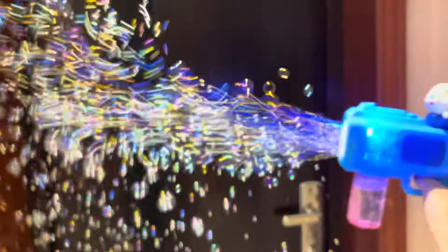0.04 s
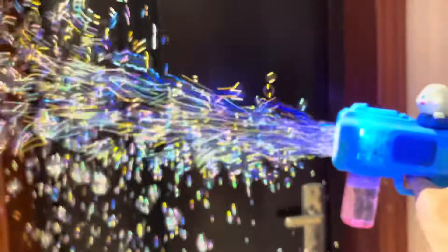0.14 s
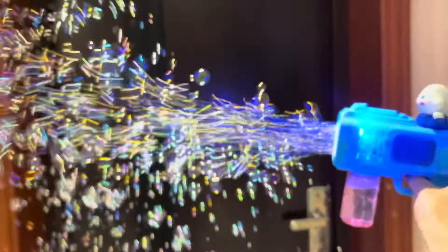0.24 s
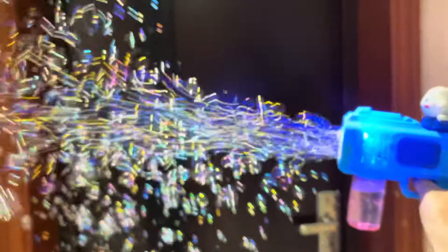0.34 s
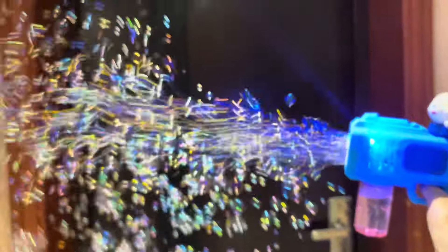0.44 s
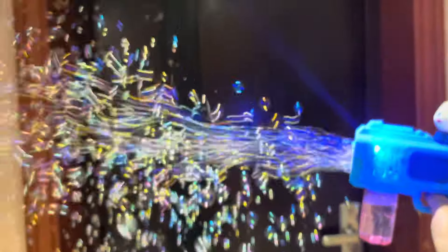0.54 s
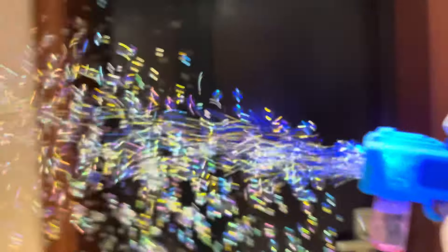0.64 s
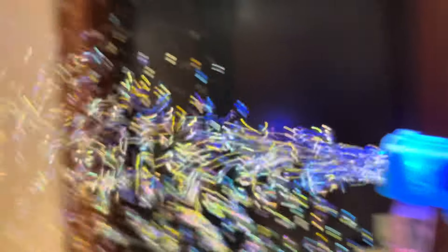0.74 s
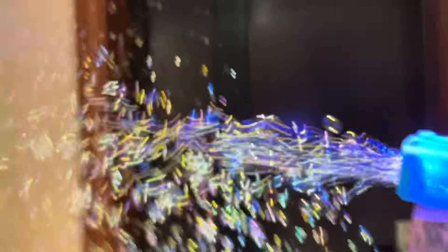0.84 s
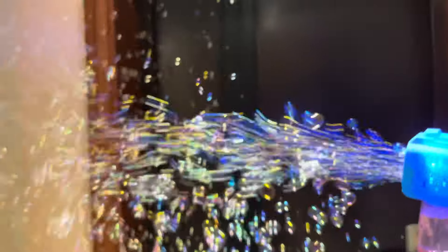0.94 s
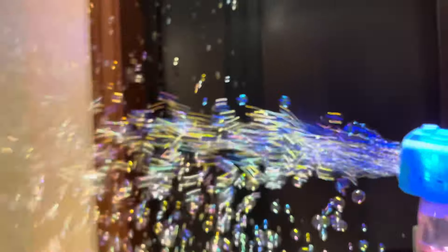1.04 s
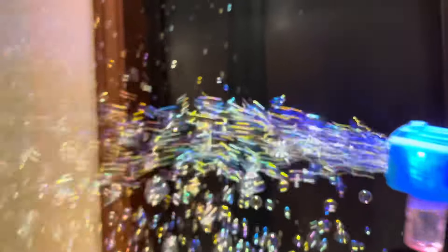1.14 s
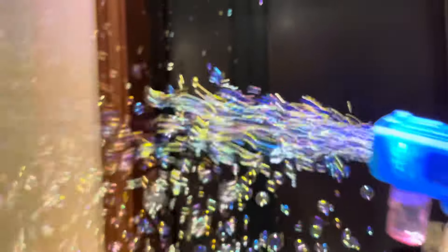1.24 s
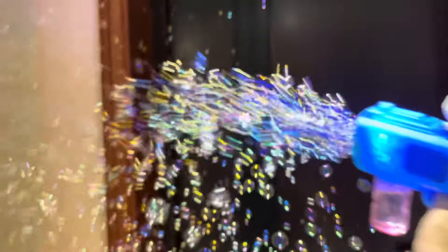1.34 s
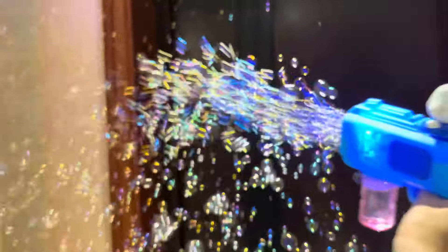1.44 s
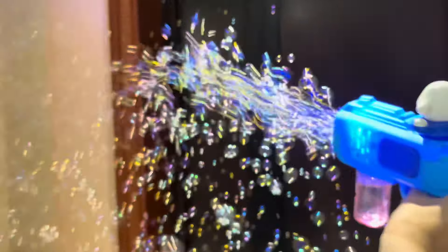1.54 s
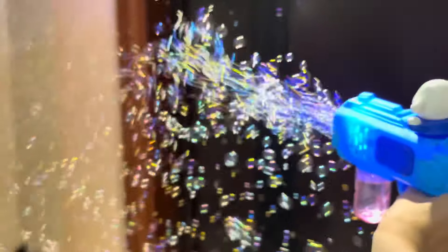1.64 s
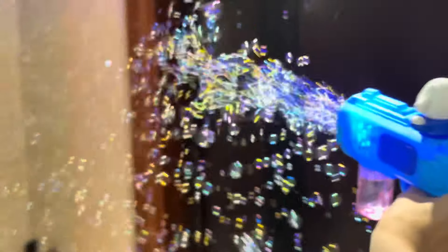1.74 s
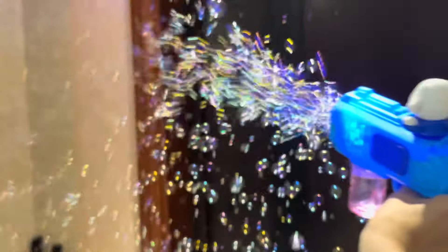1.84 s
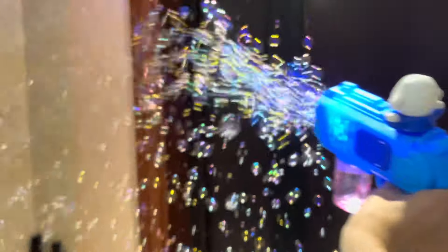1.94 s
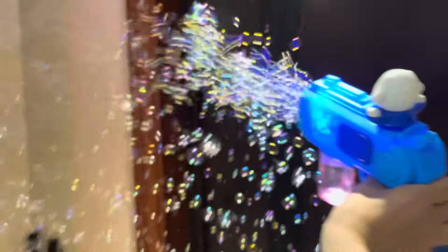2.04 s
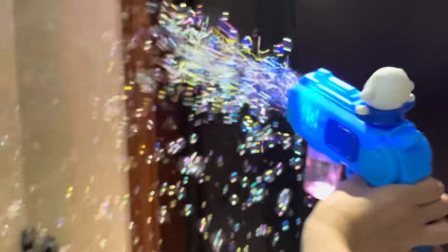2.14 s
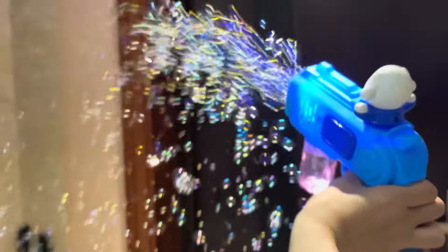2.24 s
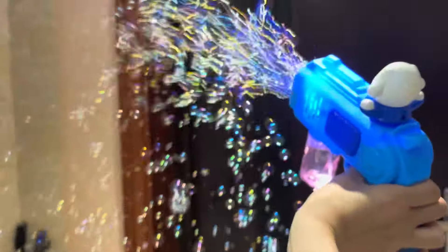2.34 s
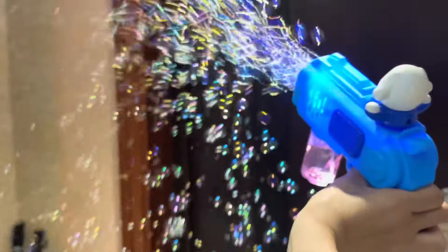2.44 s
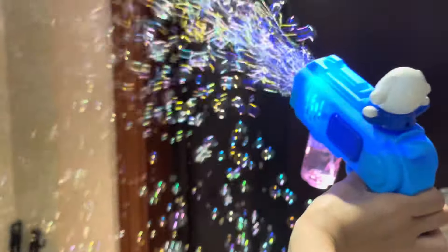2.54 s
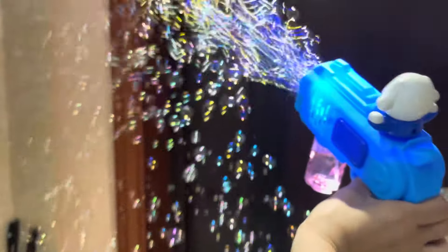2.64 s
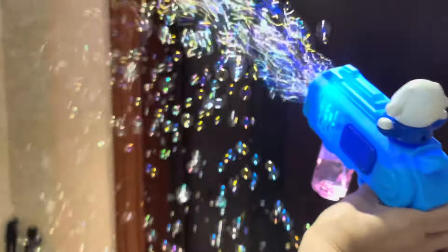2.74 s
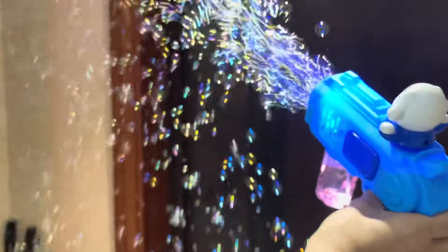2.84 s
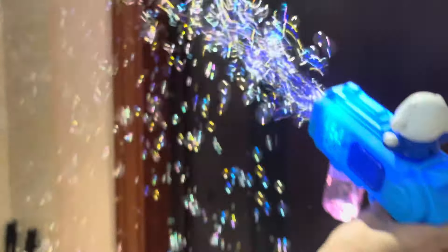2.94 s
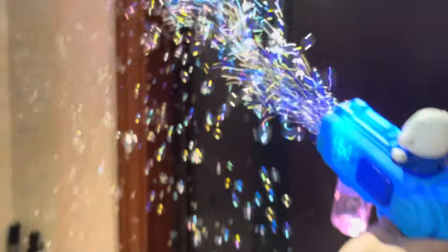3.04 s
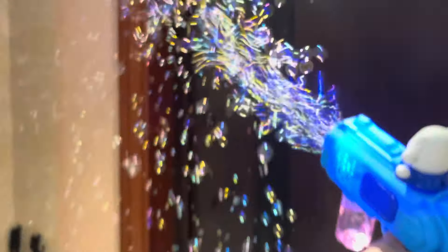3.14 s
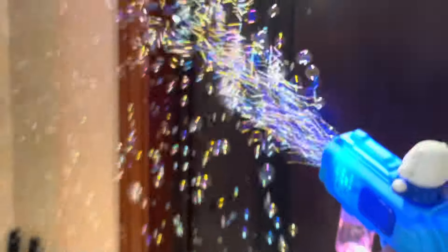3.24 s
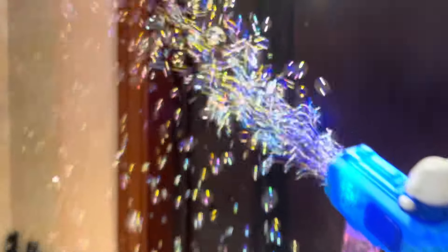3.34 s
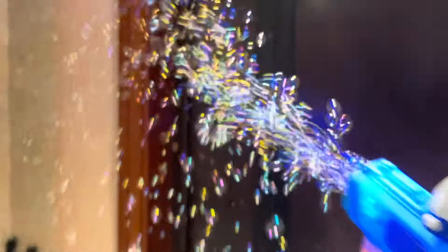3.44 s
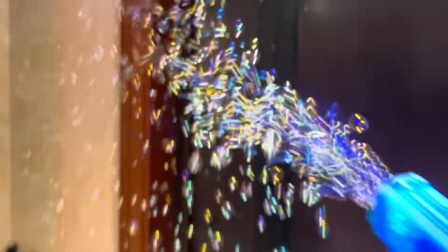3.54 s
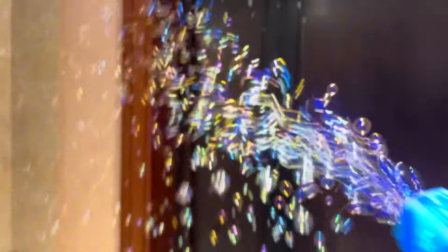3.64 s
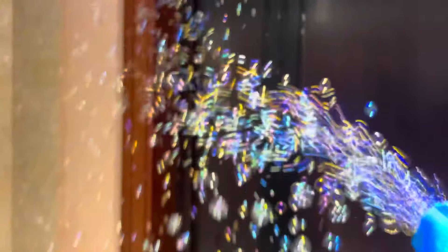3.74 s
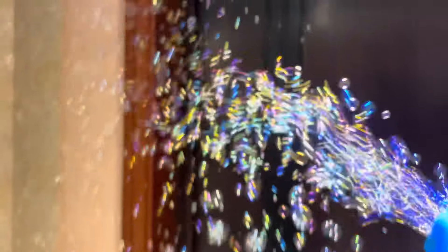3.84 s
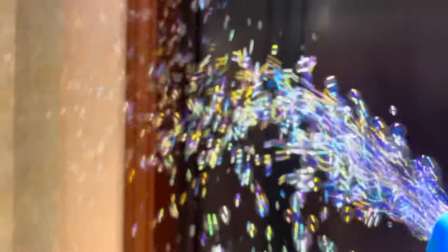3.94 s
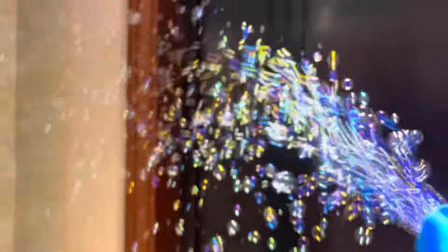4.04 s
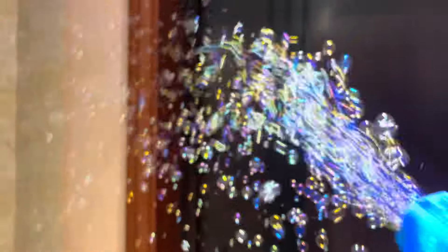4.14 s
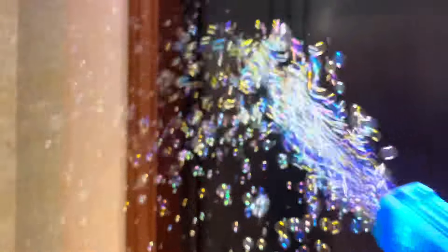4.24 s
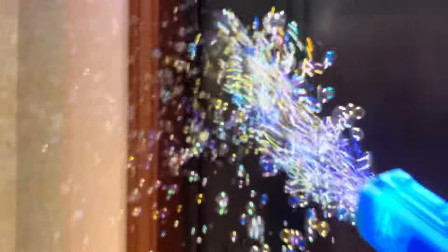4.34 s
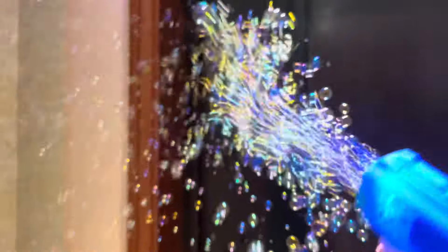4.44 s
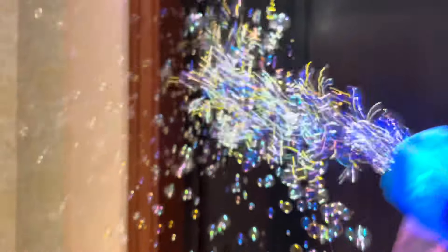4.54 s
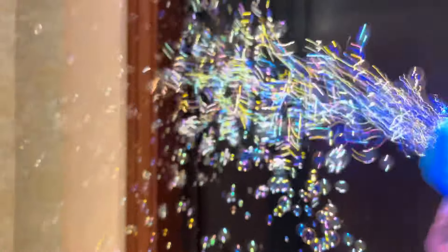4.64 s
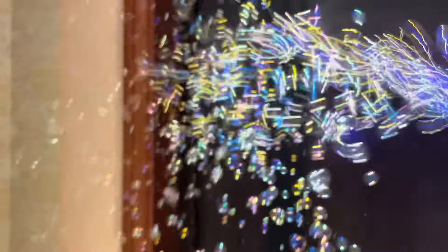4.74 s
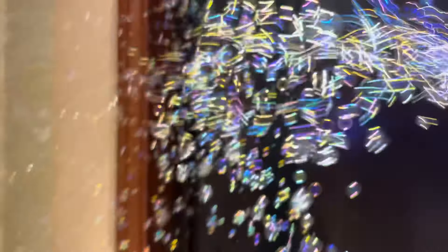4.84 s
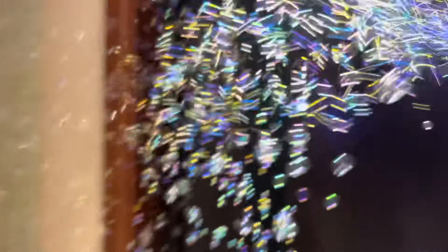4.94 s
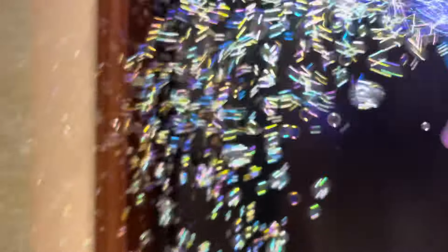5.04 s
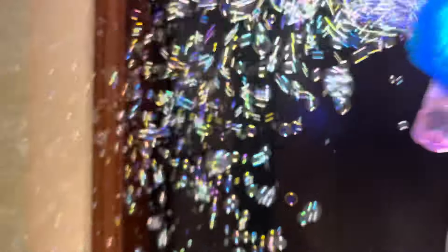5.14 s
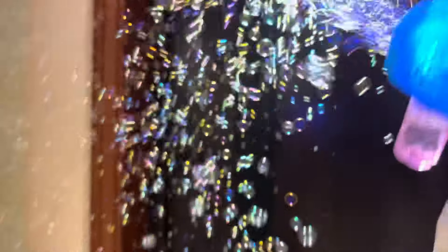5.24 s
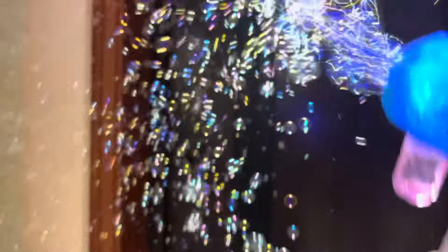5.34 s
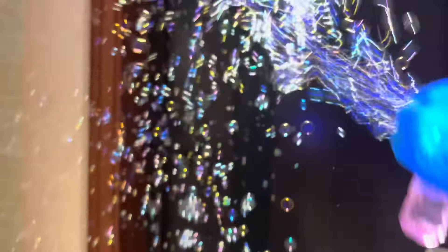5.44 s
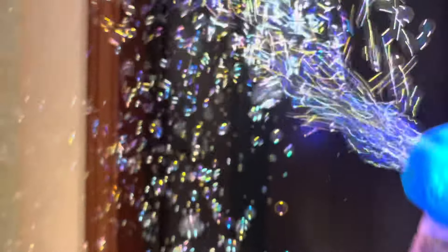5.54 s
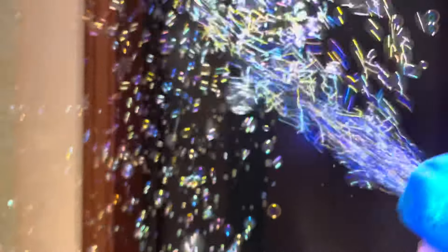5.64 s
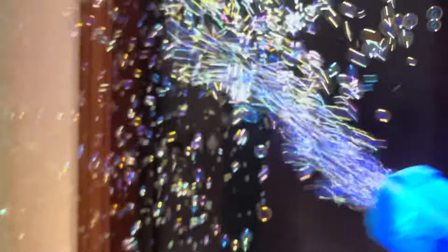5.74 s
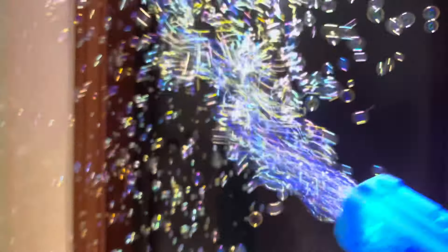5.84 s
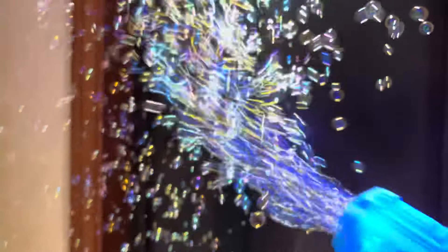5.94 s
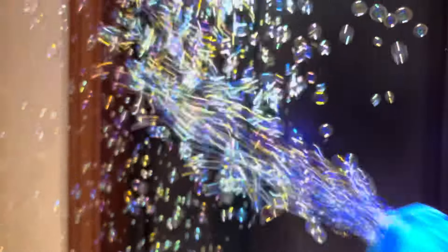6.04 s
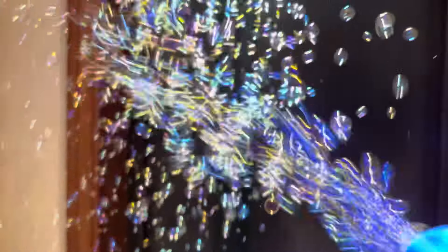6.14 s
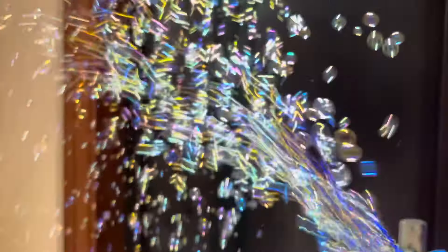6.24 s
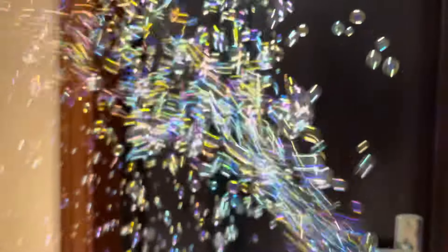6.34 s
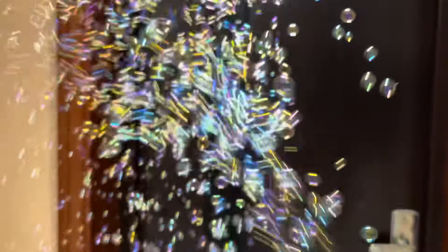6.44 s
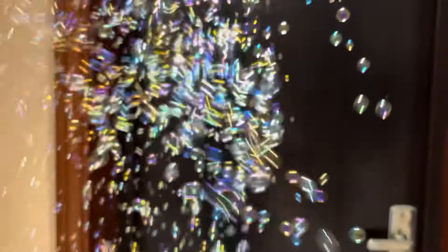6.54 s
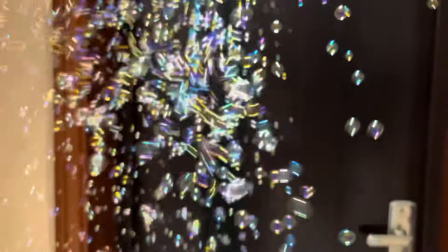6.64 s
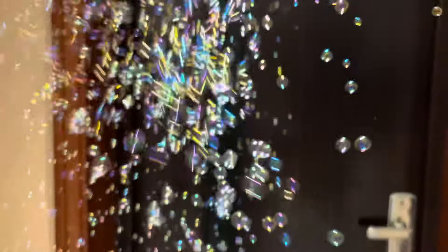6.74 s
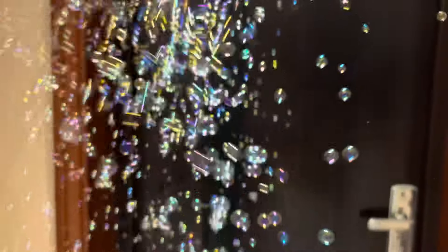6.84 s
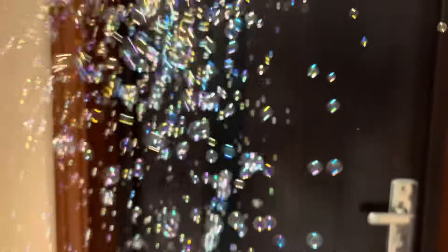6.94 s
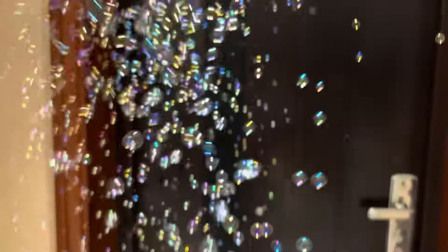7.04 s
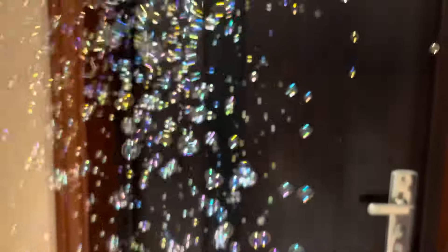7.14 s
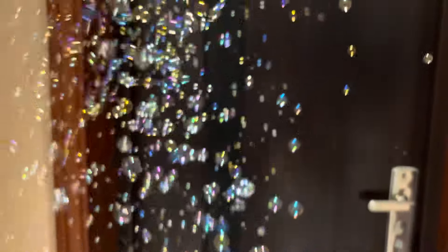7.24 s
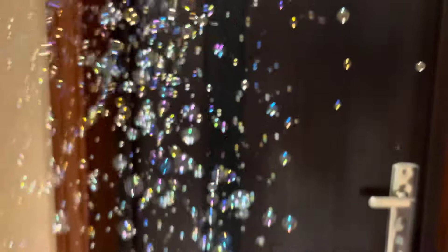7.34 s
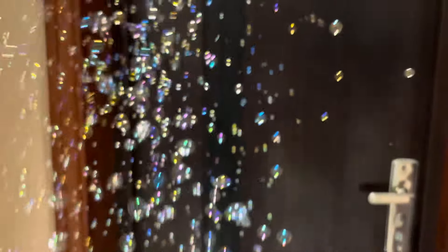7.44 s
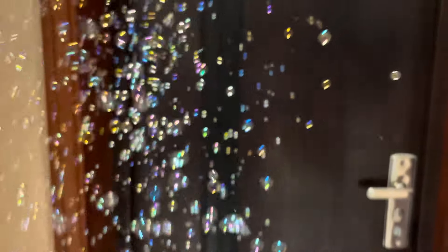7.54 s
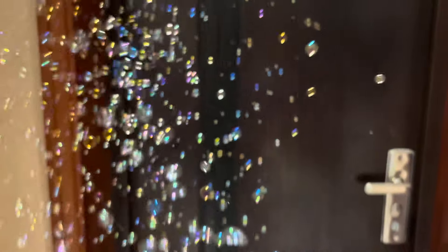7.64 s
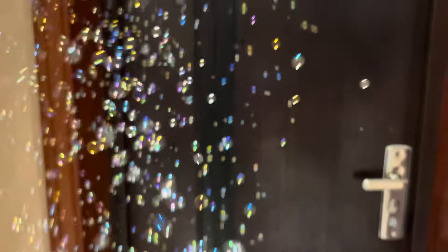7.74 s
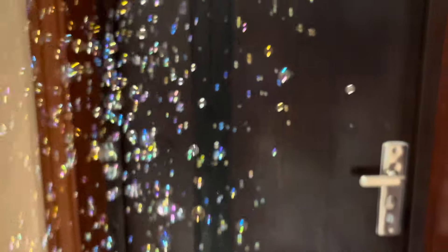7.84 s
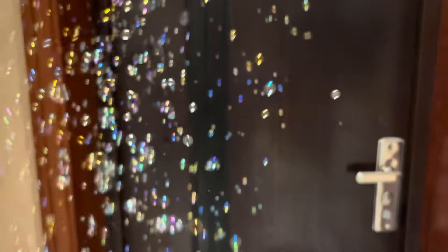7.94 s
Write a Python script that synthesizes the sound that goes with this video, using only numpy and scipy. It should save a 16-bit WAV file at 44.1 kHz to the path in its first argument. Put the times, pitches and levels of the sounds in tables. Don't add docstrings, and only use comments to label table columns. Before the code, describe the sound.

From 0 s a toy bubble gun runs at full speed very close to a stereo phone in a small hallway. Its motor hums low and steady near 260 hertz, while the fan adds a strong whistle around 1.8 kilohertz and a shimmering octave above. Plastic casing buzz, rushing nozzle air and dense, bright bubble fizz surround the tones. Until about 6.2 s, hand movement makes the whistles flicker, flare and fade unevenly between left and right, with slight pulsing in speed. At 6.2 s the trigger is released: pitch and loudness fall quickly, the whistle breaks up, and films sputter until about 6.7 s, with crisp pops and a soft low boom around 6.6 s. From 7 to 8 s only faint draught, low building rumble, distant machine drone and sparse, tiny high-pitched bubble pops remain, the draught swelling gently near 7.3 s.

```python
import sys
import numpy as np
from scipy import signal
from scipy.fft import rfft, irfft, next_fast_len
from scipy.io import wavfile
from scipy.ndimage import uniform_filter1d, map_coordinates

SR = 44100
rng = np.random.default_rng(int(sys.argv[2]) if len(sys.argv) > 2 else 0)


def gain_from_decibels(decibels):
    exponent = np.asarray(decibels, float) / 20
    return 10 ** exponent


def waveform_to_disk(signal):
    frames = np.transpose(np.atleast_2d(signal))
    scaled = np.clip(frames, -1, 1) * 32767
    samples = np.round(scaled).astype(np.int16)
    wavfile.write(sys.argv[1], SR, samples)


N = 352800
SECONDS = np.arange(N) / SR
LEFT_RIGHT = np.array([[.5], [-.5]])


def unit(x):
    return x / np.sqrt(np.mean(x ** 2) + 1e-20)


def along(points, hz):
    f, v = np.transpose(points)
    return np.interp(np.log(hz + 1), np.log(f + 1), v)


def curves(rows):
    s, *cols = np.transpose(rows)
    return [np.interp(SECONDS, s, c) for c in cols]


def bells(rows):
    return sum(np.exp(-((SECONDS - s) / half_s) ** 2) * np.array(change)[:, None]
               for s, half_s, *change in rows)


def wobble(rate):
    return map_coordinates(rng.standard_normal(int(N * rate / SR) + 4), [np.arange(N) * rate / SR])


def tone(angle, left_db, right_db, lead):
    left = gain_from_decibels(left_db) * np.sin(angle + lead / 2)
    right = gain_from_decibels(right_db) * np.sin(angle - lead / 2)
    return np.sqrt(2) * np.array([left, right])


def patchy(patch_db):
    z = signal.stft(rng.standard_normal(N), nperseg=1024)[2]

    def drift(bins, frames):
        across = uniform_filter1d(rng.standard_normal(z.shape), bins, 0)
        return unit(uniform_filter1d(across, frames, 1))

    gain_db = patch_db * drift(bins=12, frames=5) + 2.22 * drift(bins=2, frames=60)
    return unit(signal.istft(z * gain_from_decibels(gain_db), nperseg=1024)[1][:N])


def crackle(rate, spread_db, t60):
    hits = (rng.random(N) < rate / SR) * gain_from_decibels(spread_db * rng.exponential(size=N))
    t = np.arange(SR // 50) / SR
    return unit(signal.fftconvolve(hits, gain_from_decibels(-60 * t / t60))[:N] * rng.standard_normal(N))


# (frequency [Hz], lead [rad])
PORT_LEAD = [(60, -.5), (950, -.9), (1210, -1), (1720, -4.2), (2500, -6.3), (3010, -6.8), (4480, -6.7),
             (5170, -7.3), (5430, -9.7), (5860, -10.4), (6980, -9.5), (8180, -9.4), (9820, -6.5),
             (15800, -6.3)]
# (frequency [Hz], left minus right [dB])
PORT_LEAN = [(60, -0.5), (110, 4.5), (200, 3.5), (380, 3.5), (700, -2), (1290, 0.5), (2380, 2), (4400, -1),
             (8120, 2), (15000, 8)]
# (frequency [Hz], likeness [0 to 1])
PORT_LIKENESS = [(60, 0.94), (300, 1), (800, 0.75), (1200, 0.28), (1500, 0.03), (2000, 0.69), (4000, 0.69),
                 (5300, 0.57), (6500, 0.47), (7500, 1), (9000, 0.2), (10500, 0.83), (14000, 0.31),
                 (16000, 0.4)]


def ports(direct, spectrum, likeness=1, shell=()):
    m = next_fast_len(N + 8192)
    hz = np.fft.rfftfreq(m, 1 / SR)
    alike = np.clip(likeness * along(PORT_LIKENESS, hz), 0, 1)
    own = rfft(rng.standard_normal((2, N)), m)
    shared = rfft(unit(direct), m) * np.exp(1j * LEFT_RIGHT * along(PORT_LEAD, hz))
    mix = np.sqrt(alike) * shared + np.sqrt(1 - alike) * own
    ring_db = sum(db * np.exp(-((hz - centre) / width) ** 2) for centre, width, db in shell)
    colour_db = along(spectrum, hz) + ring_db + LEFT_RIGHT * along(PORT_LEAN, hz)
    return unit(irfft(mix * gain_from_decibels(colour_db), m)[:, :N])


# (time [s], shaft turns [Hz], hum level [dB], left minus right [dB])
SHAFT_DRIVE = [(0, 258, -30.5, 3), (.24, 258.4, -29.5, 3), (.68, 257.3, -29.5, 2),
               (1.12, 257.8, -28.5, 2.5), (1.4, 257.5, -27, 2), (1.62, 256.4, -27.5, 2.5),
               (2.22, 257.7, -25.5, 2), (2.5, 261.7, -28.5, 6), (3.1, 258.2, -27.5, 4),
               (3.4, 260.7, -27.5, 3.5), (3.8, 261.7, -29.5, 7.5), (4.2, 260.9, -28.5, 5),
               (4.42, 260, -27.5, 4.5), (4.64, 260, -27, 4), (4.86, 259.3, -27.5, 6),
               (5.2, 258.3, -24.5, 3.5), (5.55, 261.5, -29, 4.5), (5.8, 265, -27.5, -3)]


def speed():
    release_s, drag_s, friction_hz = 6.214, .435, 15
    driven = curves(SHAFT_DRIVE)[0]
    free_s = np.maximum(SECONDS - release_s, 0)
    turns = np.maximum((driven + friction_hz) * np.exp(-free_s / drag_s) - friction_hz, 1)
    return turns, np.log10(turns / driven)


# (shaft turns [Hz], level [dB])
HUM_RADIATION = [(25, -60), (70, -39), (110, -26), (150, -19), (172, -24), (186, -8), (238, 4), (254, 0.5)]


def shaft_hum(angle, stroke, turns):
    _, hum_db, aim_db = curves(SHAFT_DRIVE)
    hum_db = hum_db + 1.05 * np.cos(stroke - 2.3) + along(HUM_RADIATION, turns)
    return tone(angle, hum_db + aim_db / 2, hum_db - aim_db / 2, -0.69)


# (time [s], half-length [s], left level [dB], right level [dB])
WHISTLE_FLARES = [(0.0, 0.035, -9, -20), (0.26, 0.081, 2, -4.5), (0.46, 0.089, 5, -1.5),
                  (0.56, 0.21, -15, -3), (0.76, 0.042, 10, 1.5), (0.9, 0.23, -2.5, -6),
                  (1.4, 0.08, -7, 3.5), (1.64, 0.058, 1, 2.5), (2.18, 0.039, -10, -0.5),
                  (2.38, 0.31, 0.5, 2.7), (2.48, 0.035, -12, -1), (2.72, 0.045, -4, 1.1),
                  (3.06, 0.24, 0.5, -3.5), (3.24, 0.02, -16, -8), (3.7, 0.028, -5, 0),
                  (4.16, 0.084, -0.5, -8), (4.46, 0.17, -9.5, -2.5), (4.5, 0.39, 3.5, -8.5),
                  (4.66, 0.037, -2, -2), (4.84, 0.073, 3, 3), (5.08, 0.097, -3, 4), (5.18, 0.093, -6, -20),
                  (5.5, 0.18, 8, 4), (5.62, 0.088, -1.5, 4), (5.7, 0.029, 4.5, 0), (5.78, 0.1, -8, 1),
                  (.75, .045, 4.5, 9), (.63, .03, 0, -4), (1.7, .09, 4.5, 4), (3.22, 0.071, 2, 3),
                  (4.35, .17, 1.5, 5), (4.55, .06, -1, 5), (5.28, .03, -3, -4), (5.55, .06, 0, -3.5),
                  (3.85, .1, -2.5, -0.5), (6.32, 0.046, -3, -2)]
# (time [s], half-length [s], whistle level [dB], octave level [dB])
QUICK_FLICKERS = [(.09, 0.046, -0.5, 0), (3.29, .025, 1.5, -2), (4.45, 0.027, 1, 3), (3.18, 0.041, 4.5, 0),
                  (3.7, 0.047, -1, -2.5), (.23, 0.062, -2.5, 0.5), (.33, 0.025, -6, -3),
                  (.43, 0.099, 0.5, 1.5), (.74, 0.036, -7.5, -2), (2.285, 0.038, -7, 0), (2.87, .04, 2.5, 0),
                  (2.92, 0.018, -8, -1), (2.97, 0.026, -0.5, 0), (3.02, 0.035, -5, -13), (3.1, 0.025, 5, -10),
                  (3.18, 0.046, -5.5, -8), (3.35, 0.024, -5, 2.5), (3.85, .15, 2, 0), (4.1, 0.08, 2.5, 0),
                  (5.23, .05, 2, -6), (5.3, .07, 0.5, 0), (5.58, 0.053, 3.5, 3), (6.21, 0.03, 1, 2),
                  (6.14, 0.048, -0.5, 3.5), (6.24, 0.013, 3, 8), (6.262, 0.01, -9, -8), (6.28, .012, 3, 6),
                  (6.3, 0.013, 5, 2), (6.335, 0.011, 7, 0), (6.362, .012, -5.5, 0), (6.41, 0.02, 7, 0),
                  (6.455, 0.013, -8, -2), (6.49, .03, 3, 3), (6.56, 0.018, 0, 0), (2.15, .03, 0, 3),
                  (.38, .03, -0.5, -1), (1.7, 0.023, -2, -4.5), (6.59, 0.0388, 2, 2), (6.69, .04, -5, 0),
                  (2.97, 0.011, 3, 9), (3.048, 0.0083, -2, 11), (3.215, .015, 0, 11), (3.33, 0.011, 1, -7),
                  (5.04, 0.015, -5, 7), (5.09, 0.015, 3, 2), (5.165, 0.011, 2, 8), (5.3, 0.0164, 5, 6),
                  (5.525, 0.016, 0.5, 3.5)]
# (time [s], half-length [s], extra left lead [rad])
NOZZLE_SWINGS = [(0, .2, -1.9), (.33, .2, -1.4), (.6, .1, -1.3), (.75, .06, 1.3), (.95, .2, .8),
                 (1.65, .2, .45), (2.24, .07, .6), (2.45, .06, -.6), (2.7, .1, -1.1), (3.2, .2, .4),
                 (3.55, .1, -.6), (3.85, .25, -.75), (4.58, .12, .75), (5.05, .04, -.4), (5.15, .04, .6),
                 (5.48, .13, -.7), (5.87, .1, .6), (6.08, .15, .65), (6.45, .16, -.9)]


def blade_whistle(angle, decades):
    left_db, right_db = -19 + bells(WHISTLE_FLARES) + bells(QUICK_FLICKERS)[0] + 59 * decades
    left_db = left_db + (1.3 - 8 * decades) * wobble(40)
    right_db = right_db + (1.1 - 8 * decades) * wobble(40)
    return tone(7 * angle, left_db, right_db, 2.0 + bells(NOZZLE_SWINGS)[0])


# (time [s], half-length [s], left level [dB], right level [dB])
OCTAVE_FLARES = [(0.1, 0.034, -13, -5), (0.42, 0.38, -3, 3.5), (0.82, 0.24, 0.5, 7), (1.46, 0.062, 4, 3),
                 (1.7, 0.039, 2, 5.5), (1.78, 0.2, -11, 5.5), (2.06, 0.063, 2, -1), (2.38, 0.4, -20, -4.5),
                 (2.42, 0.11, 19.5, 1), (2.76, 0.2, 0, -4.5), (3.16, 0.1017, -10, -3), (3.54, 0.44, 0, 7),
                 (3.56, 0.083, -6, -19), (4.1, 0.1, -11, -7), (4.42, 0.17, 5, 6), (4.68, 0.047, -15, -8),
                 (4.77, 0.025, 4, 5), (5.02, 0.046, -5, -16), (5.44, 0.053, 3, -2), (5.56, 0.043, -1, 4),
                 (5.86, 0.095, -2, -2), (6.02, 0.033, 5, 1), (1.15, .06, -4.5, 3), (1.63, 0.034, 3, 3.5),
                 (3.12, .06, 4, 3), (4.63, .03, -1, -5), (4.79, 0.018, 3, 6), (4.85, .025, -8, -3),
                 (4.94, 0.027, 5, 1), (5.07, .015, -6, -6), (5.42, 0.096, -4.5, -5), (5.5, 0.016, -9, -6),
                 (5.68, 0.07, -4.5, 0), (.12, 0.043, -4, -3), (.23, .03, -5, 0), (.8, .09, 3.5, -1.5),
                 (3.1, .05, 7, 0), (3.96, .04, -5, 1.5), (5.36, 0.05, 1.5, 1), (5.93, 0.029, -7, -7),
                 (5.17, .08, -3, 2)]


def whistle_octave(angle, decades):
    left_db, right_db = -23.5 + bells(OCTAVE_FLARES) + bells(QUICK_FLICKERS)[1] + 175 * decades
    left_db = left_db + 2.3 * wobble(50)
    right_db = right_db + 1.75 * wobble(50)
    return tone(14 * angle, left_db, right_db, -.7 + .5 * wobble(6.9))


# (multiple of shaft turns, left level [dB], right level [dB], left lead [rad])
WEAK_ORDERS = [
    (4.035, -72, -35.5, -1.5),
    (4.956, -43, -37, 1.7),
    (26.79, -31, -41, -1.5),
]
# (multiple of shaft turns, level [dB])
GRIP_RATTLE = [
    (2, -36),
    (3, -44),
    (21, -45),
    (6, -32.5),
]
# (multiple of shaft turns, time [s], half-length [s], level [dB])
GRIP_SHIFTS = [(2, 0.42, 1, -12.5), (2, 4.766, 0.56, -7.5), (3, 0.906, 0.078, 18.5), (3, .25, 0.22, 9.5),
               (3, 1.44, .2, 7), (3, 2.4, .1, 11), (21, 2.4, 0.1, 10), (21, 2.69, .11, 16),
               (21, 2.98, 0.27, 10.5), (21, 3.5, 0.066, 12), (21, 6.8, .3, 5), (2, 5.63, 0.42, -4),
               (2, 1.5, 0.15, 4), (2, 3.64, 0.36, -3.5), (3, 5.95, .3, 6.5), (4, .4, 0.65, -5),
               (4, 1.54, .15, 3), (4, 2.28, .1, 8), (4, 3.53, 0.3, 3), (4, 7.9, .1, 2.5), (5, 1.7, .8, -2),
               (5, 5.2, .2, 12), (5, 5.3, 0.22, -4), (27, 4.4, 1, 2), (21, 1.1, .15, 5),
               (6, 1.36, 0.51, -23), (6, 4.72, 0.28, -10), (6, 5.6, 0.18, 6), (6, 5.74, 0.23, -14),
               (6, 6.2, 0.098, -8)]


def shaft_orders(angle, stroke, decades):
    out = np.zeros((2, N))
    gripped = [(multiple, db, db, -1) for multiple, db in GRIP_RATTLE]
    for multiple, left_db, right_db, lead in [*WEAK_ORDERS, *gripped]:
        shifts = [row[1:] for row in GRIP_SHIFTS if row[0] == round(multiple)]
        common_db = bells(shifts)[0] + 60 * decades + 4 * np.cos(stroke - 2.3)
        left_flicker, right_flicker = [wobble(3) + (1.8 + .1 * multiple) * wobble(20) for port in "LR"]
        lead = lead + 0.92 * wobble(2.11)
        left_db = left_db + common_db + left_flicker
        right_db = right_db + common_db + right_flicker
        out += tone(multiple * angle, left_db, right_db, lead)
    return out


def motor():
    turns, decades = speed()
    stroke = 2 * np.pi * np.cumsum(turns) / SR / 26.713 + 1.46
    tug = .0035 * (1 + .3 * wobble(2.5)) * np.cos(stroke)
    jitter = (0.001215 - 0.0944 * decades) * wobble(45)
    angle = 2 * np.pi * np.cumsum(turns * (1 + tug + jitter)) / SR
    tones = shaft_hum(angle, stroke, turns) + blade_whistle(angle, decades)
    return tones + whistle_octave(angle, decades) + shaft_orders(angle, stroke, decades)


# (frequency [Hz], level [dB per Hz])
CASING_COLOUR = [(25, -29), (45, -35), (200, -14), (420, -6), (800, -0.5), (1100, -0.5), (1400, -0.5),
                 (1900, -4.5), (3000, -24)]
# (frequency [Hz], half-width [Hz], level [dB])
SHELL_RINGS = [(480, 27, -2), (637, 18, -5), (935, 8.1, 3), (1004, 25, -1), (1183, 28, 3), (1380, 20, -4),
               (1384, 13, 6.5), (1470, 50, -3), (1640, 30, 3), (1910, 44, -5), (2200, 51, 1.5),
               (2450, 42, -1.5), (5500, 100, 1.5)]


def casing_buzz(decades):
    return gain_from_decibels(-24 + 28 * decades) * ports(patchy(patch_db=0.15), CASING_COLOUR, shell=SHELL_RINGS)


# (frequency [Hz], level [dB per Hz])
JET_COLOUR = [(900, -29.5), (1500, -9), (2250, 0.5), (2800, -2), (3400, -1), (4300, -4.5), (5400, -2),
              (6300, -7), (8000, -12.5), (11000, -45)]


def nozzle_jet(decades):
    rush = patchy(patch_db=1.15) + 0.19 * crackle(600, spread_db=4.5, t60=0.0039)
    return gain_from_decibels(-17 + 53 * decades) * ports(rush, JET_COLOUR, shell=SHELL_RINGS)


# (frequency [Hz], level [dB per Hz])
FIZZ_COLOUR = [(4000, -25.5), (6500, -2), (8000, 1), (11000, 3), (13000, 0), (14500, -3), (16000, -10.5)]


def bubble_fizz(decades):
    bursts = patchy(patch_db=1.5) + 0.32 * crackle(290, spread_db=2.5, t60=0.0088)
    return gain_from_decibels(-20.5 + 53 * decades) * ports(bursts, FIZZ_COLOUR)


# (time [s], half-length [s], level [dB])
LEANS_IN = [
    (0.1, 0.11, 0.1),
    (.85, .12, 0.2),
    (1.7, 0.086, 0.2),
    (3.8, 0.69, 0),
    (5.1, 0.37, 0.8),
]
# (time [s], half-length [s], jet and fizz level [dB])
LAST_SPUTTER = [
    (6.3, 0.14, 1.5),
    (6.64, 0.078, 7),
]


def air():
    decades = speed()[1]
    spray = (nozzle_jet(decades) + bubble_fizz(decades)) * gain_from_decibels(bells(LAST_SPUTTER))
    hand_db = bells(LEANS_IN) + 0.5 * wobble(14) + LEFT_RIGHT * -3
    return (casing_buzz(decades) + spray) * gain_from_decibels(hand_db)


# (frequency [Hz], level [dB per Hz])
RUMBLE_COLOUR = [(20, -8.5), (45, -2), (120, -5.5), (250, -7), (500, -12.5), (1000, -35)]


def room_rumble():
    return gain_from_decibels(-40.5 + 0.6 * wobble(4.5)) * ports(patchy(patch_db=0.9), RUMBLE_COLOUR, likeness=0.99)


# (frequency [Hz], level [dB per Hz])
DRAUGHT_COLOUR = [(150, -26), (420, 0), (800, 0), (1400, -1), (2250, -10), (3000, -18), (5000, -20),
                  (8000, -19), (11000, -18.5), (14500, -18), (16000, -66)]
# (frequency [Hz], level [dB per Hz])
HISS_COLOUR = [(900, -30), (1600, -4), (2500, 2), (4000, -7), (6000, -6), (8000, -28)]
# (time [s], half-length [s], level [dB])
DRAUGHT_GUSTS = [
    (6.78, 0.053, -2.5),
    (6.95, 0.1, -3),
    (7.15, 0.093, 1.5),
    (7.32, 0.13, 3.5),
    (7.57, 0.03, -1),
    (7.66, 0.017, -2),
    (7.75, .025, 1),
    (7.84, 0.054, -0.5),
    (7.93, .02, -1),
]


def draught():
    gusts_db = bells(DRAUGHT_GUSTS)
    body = patchy(patch_db=0.5) + 0.3 * crackle(90, spread_db=2, t60=.02)
    out = gain_from_decibels(-44 + gusts_db + .7 * wobble(14)) * ports(body, DRAUGHT_COLOUR, likeness=0.83)
    hiss_db = -57.5 + 2.7 * gusts_db + 1.7 * wobble(25)
    return out + gain_from_decibels(hiss_db) * ports(patchy(patch_db=5), HISS_COLOUR, likeness=0.59)


def far_bubbles():
    bursts = patchy(patch_db=2) + .7 * crackle(60, spread_db=0.0, t60=.05)
    return gain_from_decibels(-55.5) * ports(bursts, FIZZ_COLOUR)


# (frequency [Hz], width [Hz], level [dB])
MACHINE_DRONES = [
    (144.5, 4.8, -48.5),
    (57, 9.2, -52.5),
    (85.6, 6, -51.5),
    (232, 4.4, -51),
]


def far_machines():
    out = np.zeros((2, N))
    for hz, width_hz, db in MACHINE_DRONES:
        level = db + 2.0 * wobble(width_hz)
        angle = 2 * np.pi * hz * SECONDS + 0.72 * wobble(width_hz)
        out += tone(angle, level - 0.5, level - 2.0, -0.3)
    return out


# (time [s], peak level [dB], centre frequency [Hz], t60 taken over a 40 dB fall [s])
LATE_POPS = [(6.4724, -28, 3256, 0.029), (6.5026, -30, 5500, 0.028), (6.5235, -19, 4860, 0.037),
             (6.5847, -21, 11110, 0.025), (6.5902, -22, 10600, 0.033), (6.6104, -28, 4790, 0.036),
             (6.642, -22, 4670, 0.035), (6.7994, -42, 3380, 0.03), (6.8621, -40, 12200, 0.028),
             (6.8897, -35, 10500, 0.033), (7.0628, -35.5, 11000, 0.03), (7.0794, -31, 13300, 0.028),
             (7.1394, -35, 10800, 0.03), (7.1994, -42, 3660, 0.03), (7.2784, -35, 12900, 0.03),
             (7.3334, -34.5, 11900, 0.03), (7.4154, -38, 10400, 0.026), (7.447, -34.5, 10900, 0.03),
             (7.4979, -36, 12900, 0.03), (7.5995, -42, 4300, 0.02), (7.5409, -44, 3200, .025),
             (7.7504, -41, 2600, .03), (7.6281, -34, 11500, 0.03), (7.6755, -32, 12700, 0.03),
             (7.7238, -32, 12400, 0.033), (7.7754, -41, 10400, 0.03), (7.8092, -36, 12000, 0.03),
             (7.886, -33, 11000, 0.03), (7.9199, -38, 5000, 0.03)]


def pops():
    out, t = np.zeros(N + SR), np.arange(SR // 10) / SR
    hz = np.fft.rfftfreq(len(t), 1 / SR)
    for s, db, centre_hz, t60 in LATE_POPS:
        colour = np.exp(-(np.log((hz + 1) / centre_hz) / 0.4) ** 2)
        puff = unit(irfft(rfft(rng.standard_normal(len(t))) * colour, len(t)))
        out[round(s * SR):][:len(t)] += gain_from_decibels(db - 8 - 40 * t / max(t60, .004)) * puff
    return out[:N] * np.ones((2, 1))


def low_boom():
    peak_s, half_s = 6.56, 0.23
    boom_db = -34.5 - 9 * abs((SECONDS - peak_s) / half_s) ** 1.5 + 1.5 * wobble(15)
    return tone(2 * np.pi * 59.35 * SECONDS, boom_db, boom_db, 0)


def scene():
    hall = room_rumble() + draught() + far_bubbles() + far_machines()
    return motor() + air() + hall + pops() + low_boom()


def top_cut(x):
    return signal.sosfilt(signal.butter(12, 16250, fs=SR, output="sos"), x)


def record(dry):
    rounded = dry / (1 + abs(dry / .9) ** 6) ** (1 / 6)
    return top_cut(rounded)


dry = scene()
out = record(dry)
waveform_to_disk(out)
```